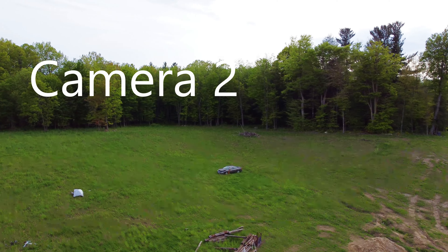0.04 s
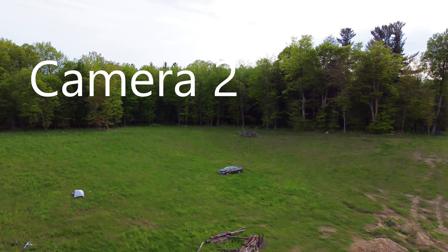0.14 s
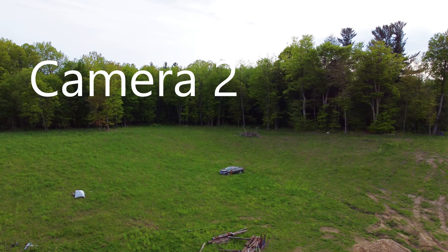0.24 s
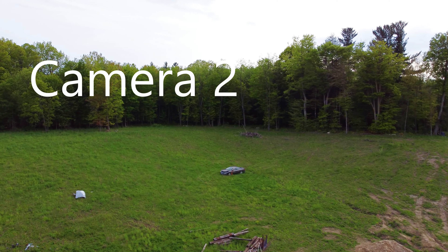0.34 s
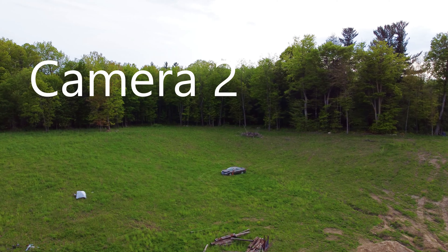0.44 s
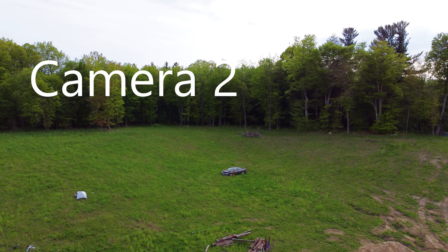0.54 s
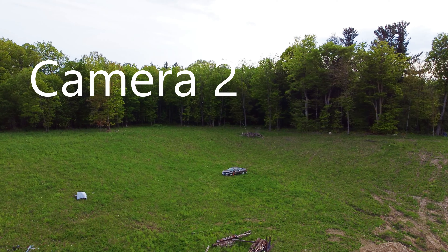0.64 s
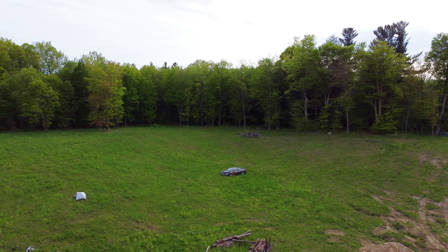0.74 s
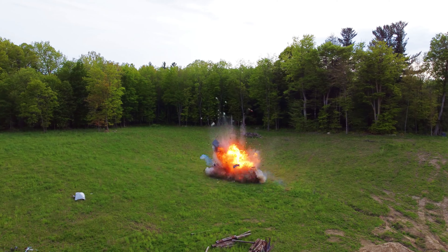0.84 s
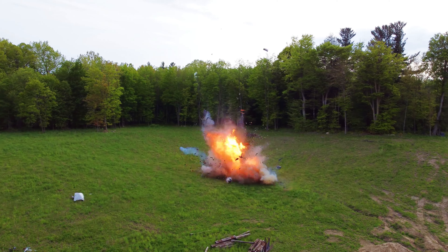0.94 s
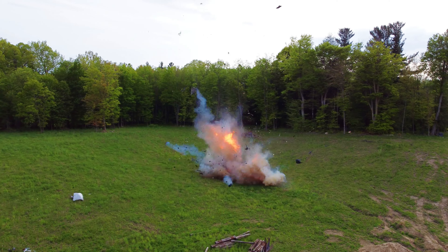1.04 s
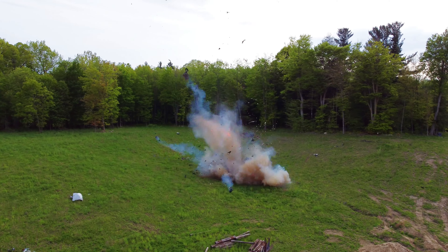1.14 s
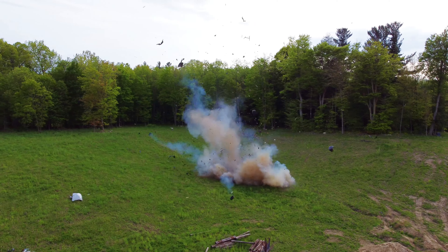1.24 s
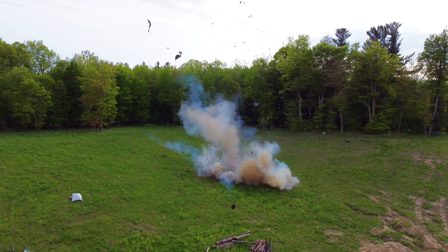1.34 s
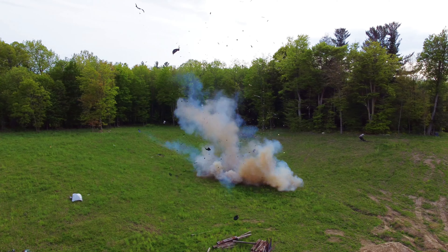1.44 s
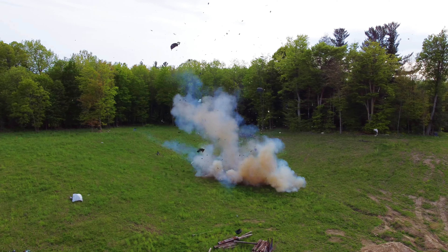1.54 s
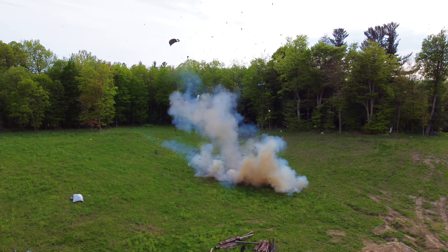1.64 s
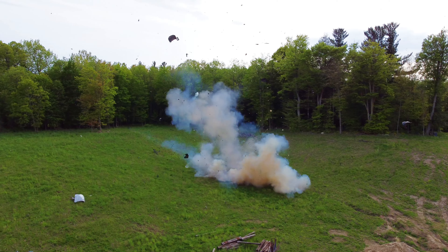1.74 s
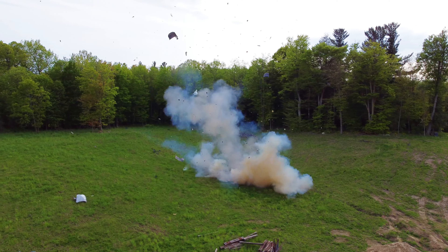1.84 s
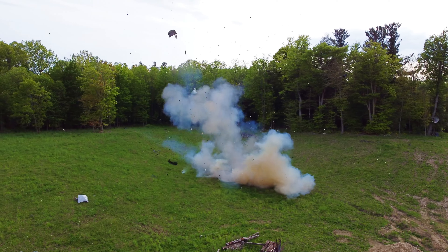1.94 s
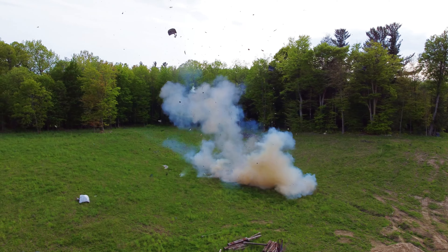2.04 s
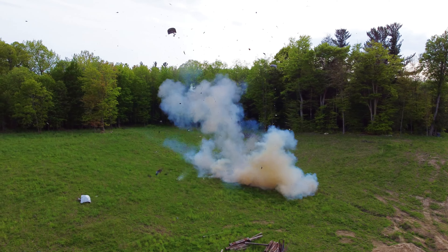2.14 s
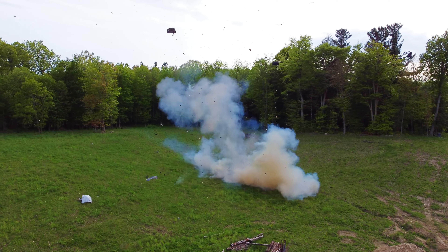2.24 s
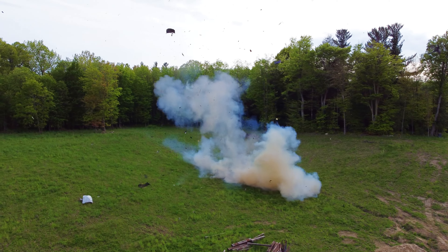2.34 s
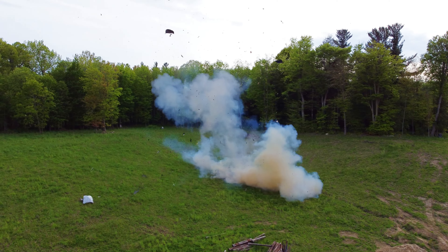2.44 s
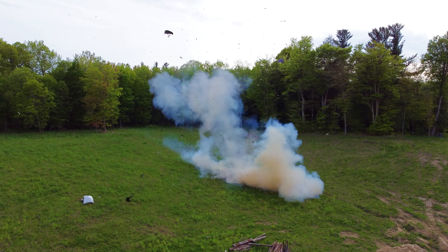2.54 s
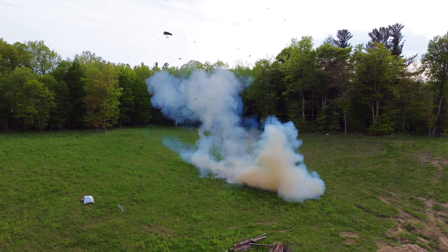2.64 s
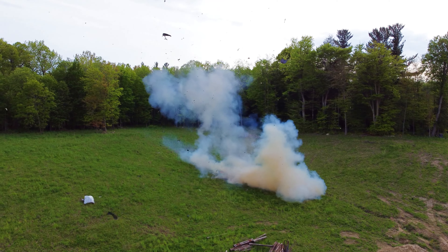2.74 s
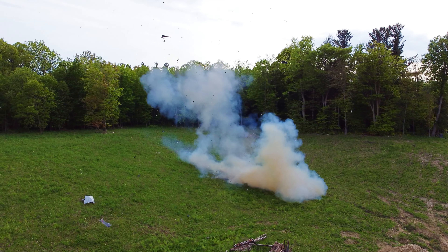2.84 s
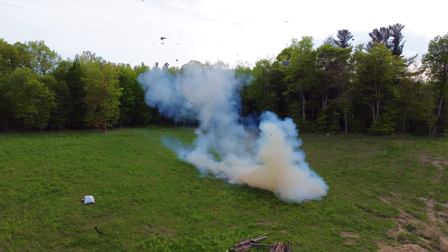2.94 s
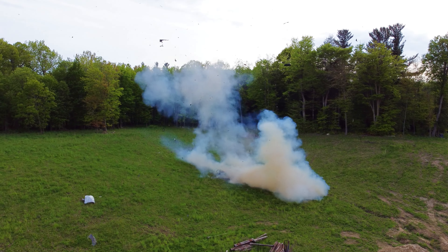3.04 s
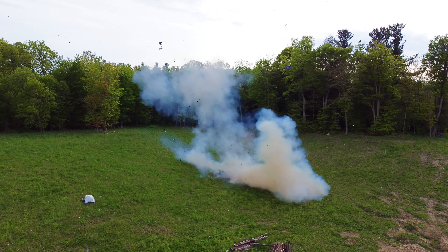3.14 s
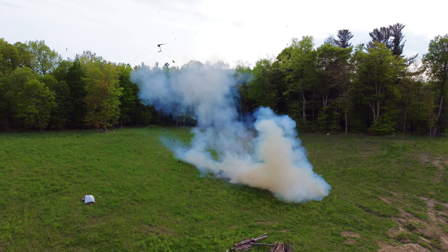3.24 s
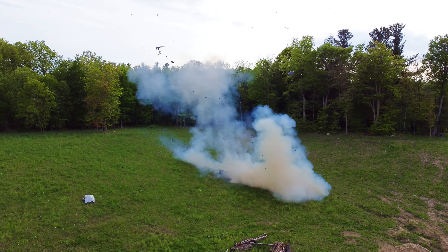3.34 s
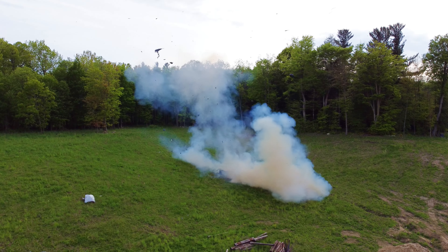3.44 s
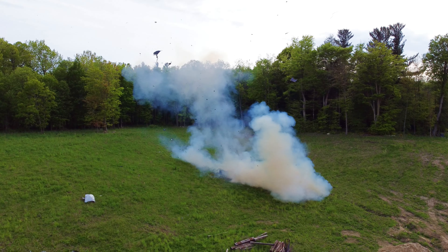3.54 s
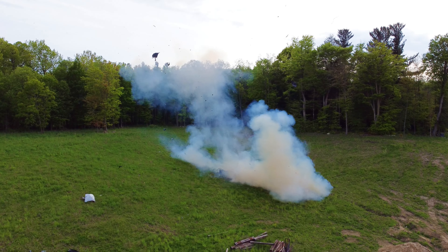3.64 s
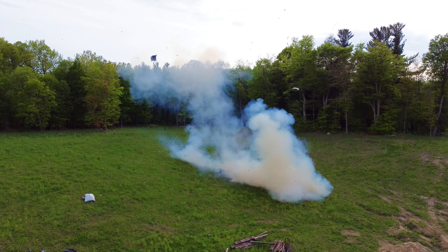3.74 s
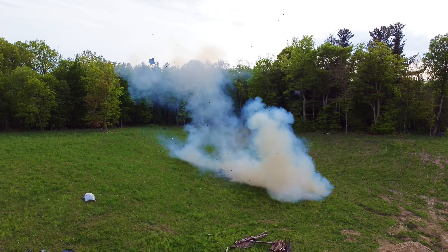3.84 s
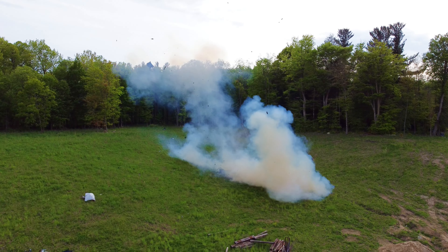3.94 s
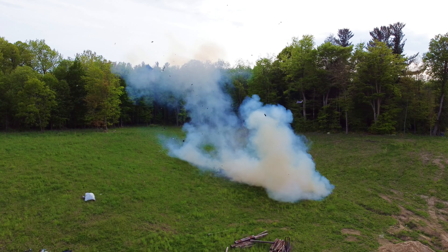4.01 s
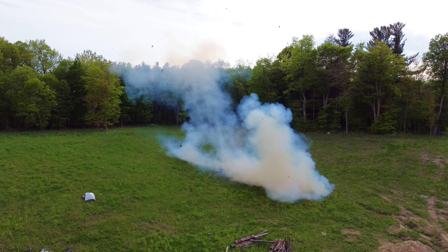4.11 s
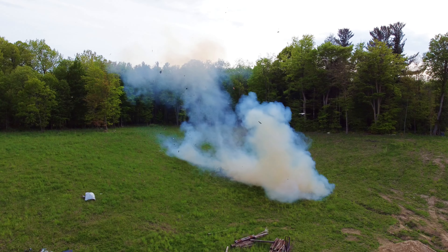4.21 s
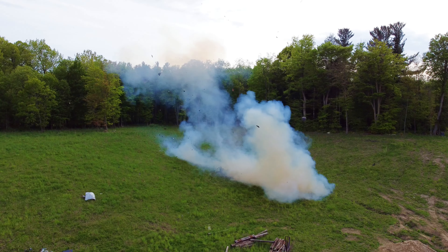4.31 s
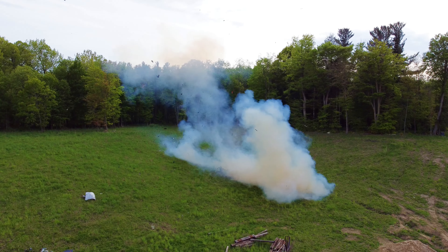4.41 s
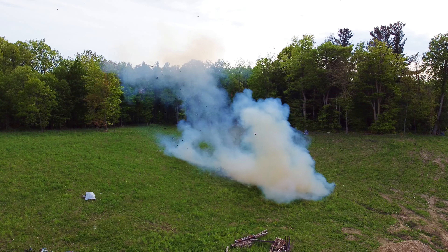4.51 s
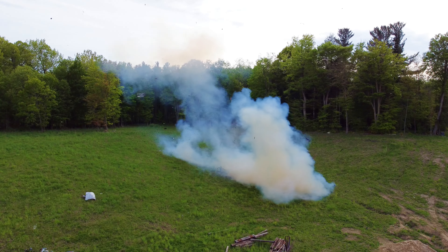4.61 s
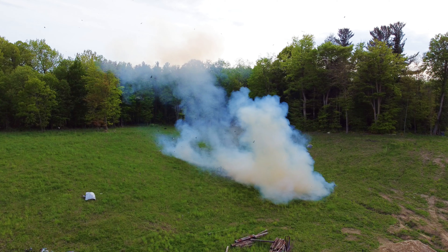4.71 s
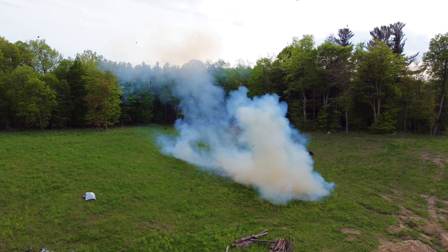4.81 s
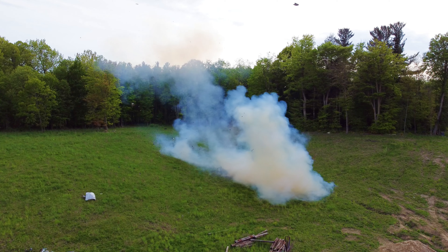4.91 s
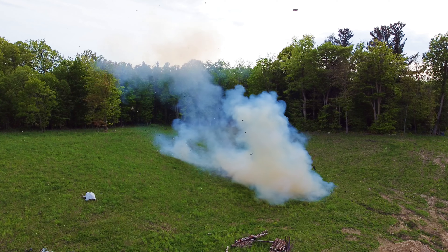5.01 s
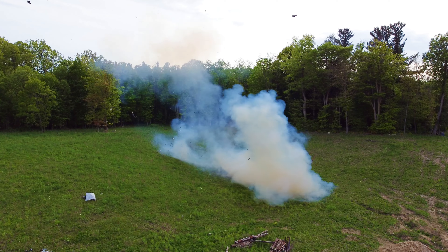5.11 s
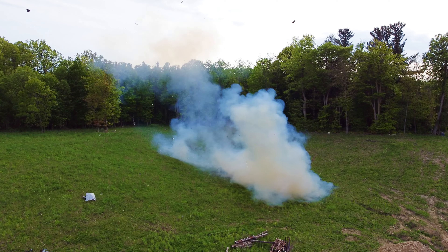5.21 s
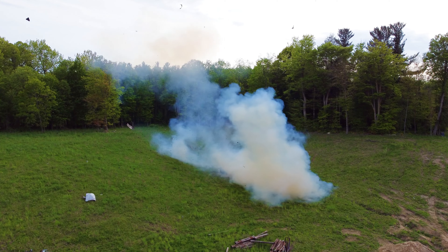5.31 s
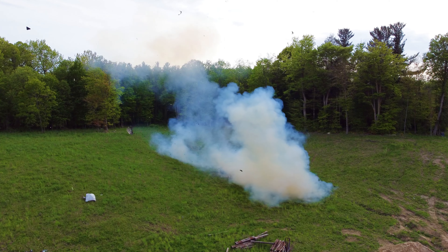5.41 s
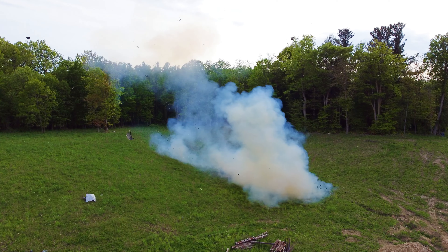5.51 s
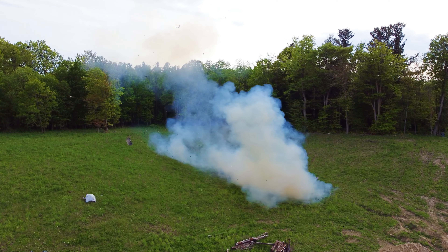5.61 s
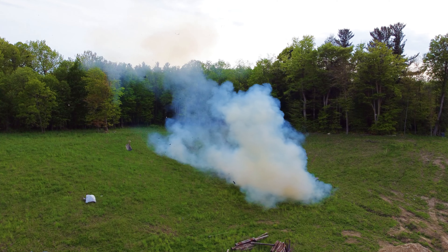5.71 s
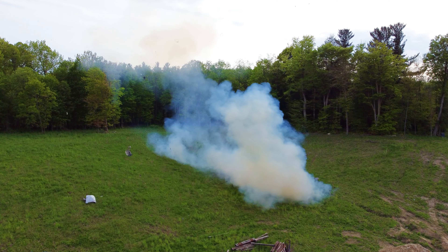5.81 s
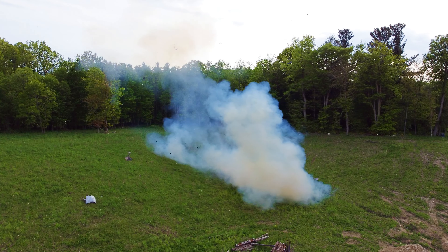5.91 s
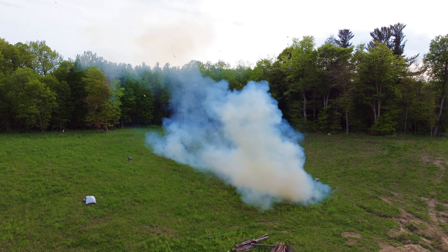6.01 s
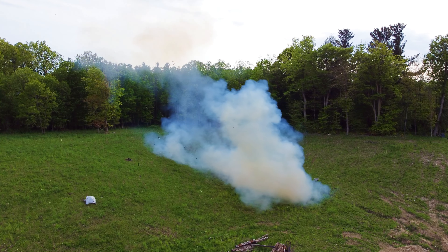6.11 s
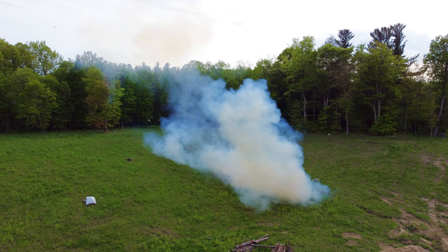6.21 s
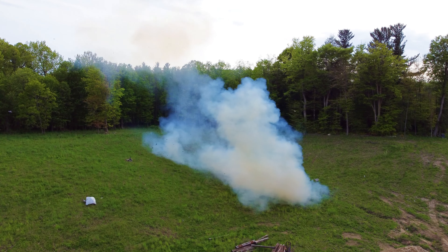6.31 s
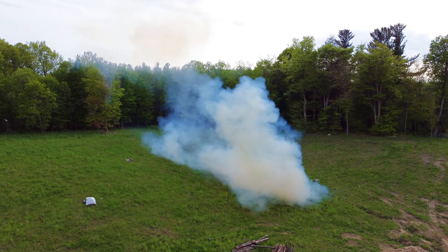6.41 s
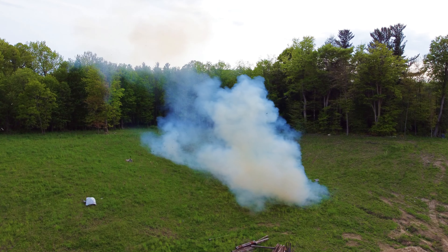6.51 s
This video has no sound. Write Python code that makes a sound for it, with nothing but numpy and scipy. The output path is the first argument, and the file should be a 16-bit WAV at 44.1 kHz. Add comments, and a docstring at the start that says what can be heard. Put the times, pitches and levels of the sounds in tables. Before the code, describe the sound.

One loud outdoor explosion echoes and rumbles away, followed by scattered sharp knocks and thuds of falling car pieces.

```python
"""A car blown up in a field

The shock front gives a short crack, and fire and shreds make a bright fizz. The boom rolls back from
the woods all around, duller the farther it has run. Debris patters, knocks and thuds on grass and leaves.
A small, nearly mono microphone picks it up; a faint field hush comes in just before the blast."""
import sys
import numpy as np
from scipy import signal
from scipy.io import wavfile

SR = 44100
rng = np.random.default_rng(int(sys.argv[2]) if len(sys.argv) > 2 else 0)


def pcm_store(signal):
    """Save signal as 16-bit PCM."""
    levels = np.round(np.clip(np.atleast_2d(signal), -1, 1) * 32767)
    wavfile.write(sys.argv[1], SR, levels.astype(np.int16).T)


N = 289296
CRACK_S = .762

# How loud the rain of fine debris is: time_s, level_db
DEBRIS_LEVELS = [(1.7, -45), (2.45, -44.5), (3.2, -46.5), (3.5, -42), (3.7, -43.5), (3.85, -43),
                 (4.05, -33), (4.3, -39), (4.62, -36.5), (4.7, -40), (5.2, -35.5), (5.8, -39.5),
                 (6.0, -40.5), (6.14, -41), (6.22, -28), (6.3, -35.5), (6.38, -32), (6.56, -40.5)]


def from_db(db):
    """Turn decibels into a gain."""
    return 10 ** (np.asarray(db) / 20)


def rms_one(x):
    """Scale a sound to an average power of 1."""
    return x / np.sqrt(np.mean(x ** 2) + 1e-20)


def in_time(levels):
    """Give a level curve's start time and its level at every sample."""
    times, level_db = np.transpose(levels)
    t = np.arange(round(times[0] * SR), min(round(times[-1] * SR), N)) / SR
    return times[0], np.interp(t, times, level_db)


def at_hz(points, hz):
    """Read a table of pitches and levels at one pitch."""
    pitches, level_db = np.transpose(points)
    return np.interp(np.log(hz), np.log(pitches), level_db)


def drift(rate_hz, size):
    """A smooth random wobble, about 1 in size."""
    step = 40   # samples between wobble points
    pole = np.exp(-2 * np.pi * rate_hz * step / SR)
    slow = signal.lfilter([1], [1, -2 * pole, pole * pole], rng.standard_normal(N // step + 2002))[2000:]
    return np.interp(np.arange(size) / step, np.arange(len(slow)), rms_one(slow))


def band(x, low_hz, high_hz):
    """Keep the sound between two pitches."""
    sos = signal.butter(2, [low_hz, min(high_hz, .45 * SR)], "band", fs=SR, output="sos")
    return signal.sosfilt(sos, x)


def noise(size):
    """Two separate hisses, each with a mid (both channels) and a side (left minus right) part."""
    return rng.standard_normal((2, 2, size))


def add(out, start_s, sound):
    """Mix a stereo sound in at its start time."""
    at = round(start_s * SR)
    out[:, at:at + sound.shape[1]] += sound[:, :N - at]
    return out


def lean(hz, pan_db=0.0):
    """Left and right gains for one pitch."""
    # The microphone leans left in the bass: pitch_hz, left_minus_right_db
    tilt = [(30, 0.5), (110, 3.5), (220, -1), (10000, -0.5)]
    return from_db((at_hz(tilt, hz) + pan_db) / 2 * np.array([[1], [-1]]))


def layer(levels, tone, flicker, rate_hz, source=noise, loss_db_per_s=0):
    """Narrow bands of noise that flicker and follow a level curve. The air loss is given at 4 kHz."""
    # How little the two channels differ: pitch_hz, side_minus_mid_db
    side_share = [(30, -24), (300, -23), (1500, -25), (4500, -21), (8000, -15)]
    start_s, level_db = in_time(levels)
    size = len(level_db)
    loss_db = loss_db_per_s * np.arange(size) / SR
    shared_wobble, raw = drift(rate_hz, size), source(size)
    out, power = 0, 0
    edges_hz = 22 * 2 ** np.arange(0, 9.3, .33)
    for k, (low, high) in enumerate(zip(edges_hz, edges_hz[1:])):
        hz = np.sqrt(low * high)
        if not tone[0][0] / 1.5 < hz < tone[-1][0] * 1.5:
            continue
        mid, side = band(raw[k % 2], low, high) * from_db(at_hz(tone, hz))
        power += np.mean(mid ** 2)
        wobble_db = flicker * (1.15 * shared_wobble + 1.02 * drift(rate_hz, size))
        air_db = loss_db * (hz / 4000) ** 1.49   # air takes more from higher pitches
        stereo = mid + from_db(at_hz(side_share, hz)) * side * [[1], [-1]]
        out = out + from_db(wobble_db - air_db) * lean(hz) * stereo
    return add(np.zeros((2, N)), start_s, from_db(level_db) * out / np.sqrt(power))


def pulses(rows, octaves):
    """Each pulse is one push and its rebound: a click through a wide band."""
    out = np.zeros((2, N))
    click = np.eye(1, SR // 10)[0] + 1e-18
    spread = 2 ** (octaves / 2)
    for start_s, peak_db, hz in rows:
        push = band(click, hz / spread, hz * spread)
        add(out, start_s, from_db(peak_db) * push / np.abs(push).max() * lean(hz))
    return out


def bursts(rows, trim_db, rise_s=1e-4):
    """Each landing is a sudden burst of noise that fades at a rate of 60 dB in fade_s."""
    out = np.zeros((2, N))
    for start_s, level_db, hz, octaves, fade_s, *pan_db in rows:
        spread = 2 ** (np.clip(octaves, .3, 5) / 2)
        white = rng.standard_normal(SR // 3)[:round(max(fade_s, .04) * SR)]
        hiss = rms_one(band(white, hz / spread, hz * spread))
        t = np.arange(len(hiss)) / SR
        burst = hiss * from_db(level_db - trim_db - 60 * t / fade_s) * (1 - np.exp(-t / rise_s))
        burst = band(burst, hz / spread / 1.93, hz * spread * 1.32)   # the ground softens the first edge
        scatter_db = 1.2 * rng.normal()
        add(out, start_s, burst * lean(hz, sum(pan_db) + scatter_db))
    return out


def hush(start_s=.318, fade_s=.017, level_db=-58.5):
    """Far traffic and leaves, very faint, until the blast covers them."""
    # Tone of the quiet field: pitch_hz, level_db
    tone = [(25, -5), (120, -1), (230, -12), (400, -23), (620, -13), (830, -15), (1000, -21.5),
            (2500, -30.5), (5000, -34), (11000, -37.5)]
    levels = [(start_s, level_db - 27), (start_s + fade_s, level_db),
              (CRACK_S - fade_s, level_db), (CRACK_S + fade_s, level_db - 9)]
    return layer(levels, tone, flicker=0.9, rate_hz=10.0)


def crack(swell_s=.0085, tail_s=.002, top_db=-15):
    """The shock front swells for under a hundredth of a second and stops dead."""
    # Pitch range of the shock: low_hz, high_hz
    edges = (346, 4800)
    top_s, tail_db = CRACK_S + swell_s, top_db - 17
    start_s, level_db = in_time([(CRACK_S, top_db - 15), (top_s, top_db),
                                 (top_s + tail_s / 2, tail_db), (top_s + 2 * tail_s, tail_db)])
    white = rng.standard_normal(len(level_db))
    front = rms_one(band(band(white, *edges), *edges))
    return add(np.zeros((2, N)), start_s, from_db(level_db) * front * lean(1000))


def air_pushes():
    """The shock, its first echo and heavy landings each shove the air once."""
    # Pushes of air: start_s, peak_db, pitch_hz
    pushes = [(.7684, -12, 510), (.9458, -6.5, 800), (.9462, -31, 100), (3.249, -16.5, 60),
              (3.497, -25.5, 297), (3.5665, -22.5, 600), (3.9, -18.5, 600), (5.31, -15, 82),
              (5.553, -26, 87.5), (6.218, -16, 484), (6.3135, -12.5, 750)]
    return pulses(pushes, octaves=1.58)


def fizz():
    """Fire and shreds hiss brightly straight after the crack."""
    # The fireball's hiss, with one brief dip: time_s, level_db
    levels = [(.773, -53), (.7742, -21), (.855, -19.5), (.868, -21.5), (.885, -18.5), (1.0, -28),
              (1.1, -60)]
    # Its tone: pitch_hz, level_db
    tone = [(100, -19), (250, -11.5), (500, -6), (1500, -3), (2800, -2), (4500, -7), (9400, -11),
            (11800, -40)]
    return layer(levels, tone, flicker=2.37, rate_hz=86.0)


def roar():
    """Scattered echoes: later ones have run farther, so the air has taken more treble."""
    # The echoes before air loss: time_s, level_db
    levels = [(.93, -50), (.96, -22), (1.06, -19.5), (1.2, -14), (1.4, -11.5), (1.75, -12.5), (2.3, -23.5),
              (2.5, -25), (2.62, -24), (2.75, -31.5), (3.4, -35), (3.8, -58)]
    # Their starting tone: pitch_hz, level_db
    tone = [(200, -12), (400, -3), (800, -2.5), (1600, -2), (3000, -5.5), (6000, -5), (9400, -11.5),
            (11800, -25)]
    return layer(levels, tone, flicker=1.38, rate_hz=49.0, loss_db_per_s=13.0)


def boom():
    """The blast rolls back from the woods, low and lumpy."""
    # The roll sinking away: time_s, level_db
    levels = [(.94, -72), (.96, -23), (1.0, -17.5), (1.45, -22.5), (1.7, -18), (2.2, -20.5), (2.7, -28),
              (3.3, -36), (4.2, -34), (5.2, -37.5), (6.1, -46.5), (6.56, -43)]
    # Its tone: pitch_hz, level_db
    tone = [(60, -14), (90, -8), (130, -1), (230, 0.5), (400, -5.5), (700, -11), (1200, -19)]
    return layer(levels, tone, flicker=1.0, rate_hz=16.0)


def rumble():
    """The deepest part of the roll fades most slowly."""
    # The deep roll: time_s, level_db
    levels = [(.94, -72), (.96, -32), (1.3, -36.5), (1.8, -27.5), (2.2, -32), (3.4, -42), (5.8, -42),
              (6.56, -46)]
    # Its tone: pitch_hz, level_db
    tone = [(22, 2.5), (40, -9.5), (70, 0), (110, -24)]
    return layer(levels, tone, flicker=1.5, rate_hz=6.5)


def grains(size):
    """Grains of uneven size land in clumps, each about a millisecond long, over a soft rustle."""
    grains_per_s = 520 * from_db(6.0 * drift(15.0, size))
    lands = rng.random((2, 2, size)) < grains_per_s / SR
    sizes = from_db(4.5 * np.minimum(rng.exponential(1, (2, 2, size)), 4))
    tails = signal.lfilter([1], [1, -np.exp(-1 / (0.0011 * SR))], lands * sizes)
    return rms_one(tails * noise(size)) + from_db(1.0) * noise(size)


def patter():
    """Fine debris rains on leaves and grass."""
    # Tone of the debris: pitch_hz, level_db
    tone = [(300, 2), (600, 2.5), (1200, 0), (2500, -2.5), (5000, -6), (7500, -7), (9400, -16.5),
            (11800, -28)]
    return layer(DEBRIS_LEVELS, tone, flicker=2.0, rate_hz=7.1, source=grains)


def ticks(per_s=70):
    """Small chips land at random moments, louder when the patter is louder."""
    count = round(per_s * (DEBRIS_LEVELS[-1][0] - DEBRIS_LEVELS[0][0]))
    when, size, pitch, length = rng.random((count, 4)).T
    first_s, patter_db = in_time(DEBRIS_LEVELS)
    start_s = first_s + when * (N / SR - first_s)
    level_db = patter_db[(when * (len(patter_db) - 1)).astype(int)] + 2 + 13 * size ** 2
    pitch_hz, octaves = 1200 * 2 ** (2.9 * pitch), np.full(count, 1.6)
    fade_s = 0.0033 + 0.035 * length ** 3
    return bursts(zip(start_s, level_db, pitch_hz, octaves, fade_s), trim_db=6.0)


def knocks():
    """Pieces knock as they land; narrow bands ring, wide ones rustle."""
    # Falling pieces: start_s, level_db, pitch_hz, width_octaves, fade_s
    pieces = [(1.7403, -21, 8400, 0.37, .032), (2.516, -29, 2500, 1.5, .03),
              (2.536, -25.5, 7400, .7, 0.037), (2.639, -19.5, 8000, .7, 0.039),
              (2.6825, -25.5, 5500, 1.4, 0.13), (2.7894, -27, 7600, 0.44, 0.063),
              (2.8344, -30.5, 7700, .6, 0.046), (3.2218, -20, 960, 1.1, 0.086),
              (3.4525, -30.5, 2500, 3.6, 0.46), (3.7774, -18, 8950, 0.32, 0.021),
              (3.805, -16, 5360, .4, 0.011), (3.8945, -12, 2600, 0.74, 0.034), (3.935, -20, 2490, 2, 0.059),
              (3.957, -5.5, 5850, 6.3, 0.1), (3.9803, -13.5, 6900, 0.73, 0.031),
              (4.1016, -14, 2320, 0.27, 0.021), (4.178, -14, 5600, 1.9, 0.024),
              (4.3695, -10.5, 1190, 0.58, 0.055), (4.3987, -11.5, 4900, 1.64, 0.1),
              (4.4653, -14.5, 1760, 2.6, 0.082), (4.5047, -12.5, 3100, 1.1, 0.016),
              (4.533, -17.5, 1670, 1.5, 0.058), (4.5447, -17.5, 6760, 1.2, .041),
              (4.5728, -16.5, 2210, 1.5, .048), (4.609, -17, 2840, 2.1, 0.048),
              (4.7193, -25.5, 2560, 1.5, .11), (4.7432, -18, 3900, 0.86, 0.043),
              (4.802, -22, 6250, 1.1, 0.07), (4.8216, -10, 2270, 1.7, .057), (4.836, -18, 2740, 1.1, 0.07),
              (4.8664, -23.5, 9350, .3, .021), (4.9406, -22, 6230, 0.97, 0.19),
              (5.097, -20.5, 5840, 1.6, .034), (5.1852, -22, 3260, 0.74, .14),
              (5.1931, -11, 5670, 1.5, .046), (5.2305, -23, 2030, .9, .045), (5.2756, -22, 7160, 0.9, .067),
              (5.3266, -13.5, 6000, 0.88, 0.061), (5.5034, -18.5, 7310, .6, 0.042),
              (5.6592, -21.5, 6060, 1.05, .12), (5.7099, -20.5, 5400, 1.2, .087),
              (6.208, -22, 2320, 1.4, 0.069), (6.222, -15, 5600, .8, 0.031), (6.265, -22, 3330, 1.2, .17),
              (6.3426, -3, 2060, 1.75, 0.026), (6.393, -29, 6350, 0.98, 0.037),
              (6.413, -14, 1070, 0.96, 0.12)]
    return bursts(pieces, trim_db=10.0)


def thuds():
    """Heavy panels hit turf, which gives way and softens the start; the last one slides off."""
    # Falling panels: start_s, level_db, pitch_hz, width_octaves, fade_s, left_minus_right_db
    panels = [(3.222, -17, 150, 3.4, .079, 4), (3.964, -8.5, 430, 2.53, 0.27, -1.5),
              (4.0, -9.5, 284, 0.98, 0.27, 0), (4.035, -13.5, 320, 1.66, .48, -3),
              (4.368, -14.5, 504, 2.8, 0.083, -1), (4.82, -20.5, 364, 1.4, 0.15, 1),
              (5.285, -12, 472, 1.03, .2, -0.5), (5.303, -7.5, 266, 2, 0.14, 1.5),
              (5.333, -19, 480, 0.89, .26, -0.5), (5.5, -21.5, 250, 0.89, 0.13, 1),
              (6.153, -24.5, 217, 0.66, 0.81, -1.5), (6.185, -29, 286, 0.97, 0.33, -1),
              (6.26, -19, 287, 1.4, .2, -1), (6.42, -28, 1750, 2.2, 1, -0.5)]
    return bursts(panels, trim_db=2.0, rise_s=0.0045)


def snaps():
    """Short, dry snaps sound among the falling debris."""
    # Sharp clicks: start_s, peak_db, pitch_hz
    clicks = [(3.7789, -19.5, 5000), (3.814, -18, 4900), (4.0872, -12.5, 3550), (4.3442, -20, 3000),
              (4.3786, -13, 1450), (4.894, -19, 2000), (5.6048, -15, 2880), (5.7442, -21, 6600),
              (5.7732, -8, 3070), (5.8565, -20, 3980), (6.134, -23, 4000), (6.313, -20, 3000),
              (6.3438, -17, 3500)]
    return pulses(clicks, octaves=1.98)


def scene():
    """The quiet field, the blast, its echoes and the falling debris."""
    landings = knocks() + thuds() + snaps()
    field_and_blast = hush() + crack() + air_pushes() + fizz()
    echoes = roar() + boom() + rumble()
    return field_and_blast + echoes + patter() + ticks() + landings


def record(dry):
    """The microphone rounds off loud peaks and cuts the treble above 11 kHz."""
    rounded = .8 * np.tanh(dry / .8)
    return signal.sosfilt(signal.ellip(14, .5, 62, 11000, fs=SR, output="sos"), rounded)


dry = scene()
out = record(dry)
pcm_store(out)
```